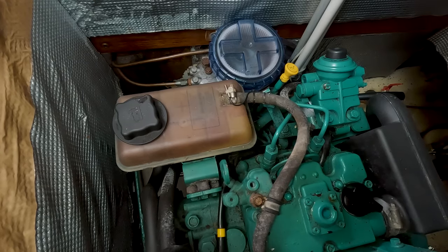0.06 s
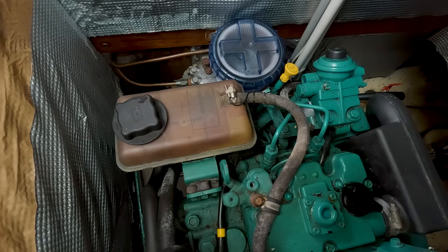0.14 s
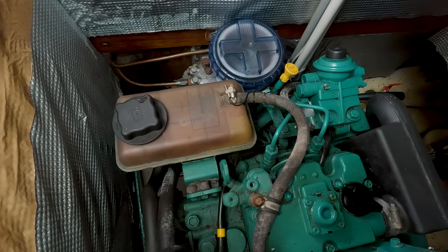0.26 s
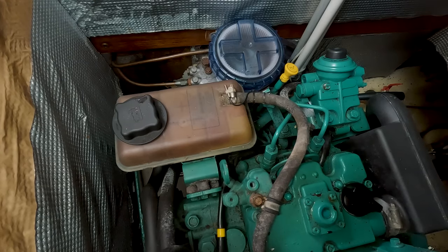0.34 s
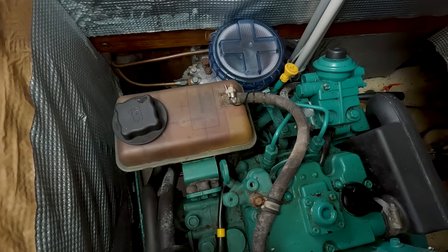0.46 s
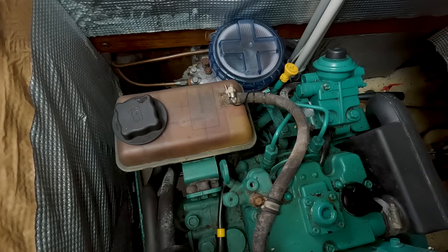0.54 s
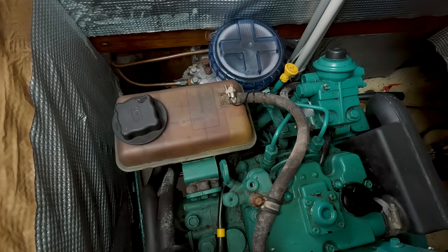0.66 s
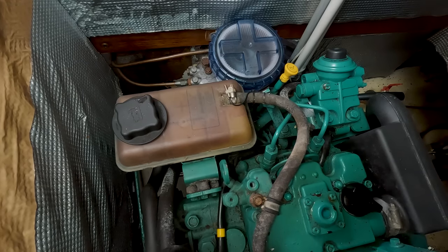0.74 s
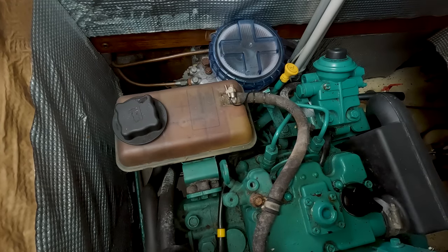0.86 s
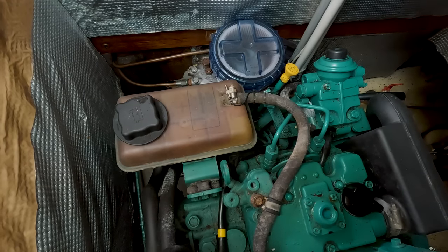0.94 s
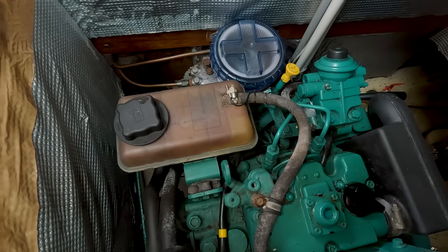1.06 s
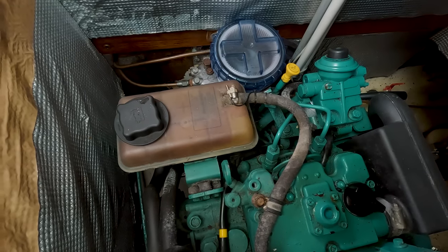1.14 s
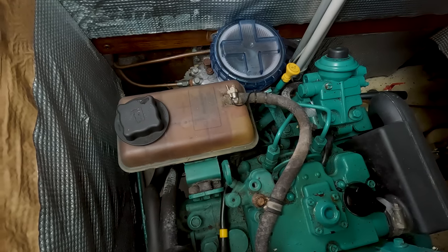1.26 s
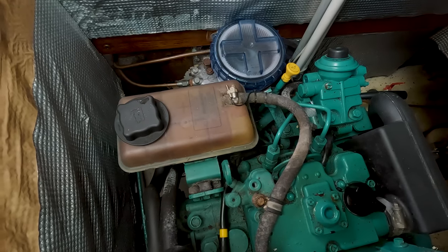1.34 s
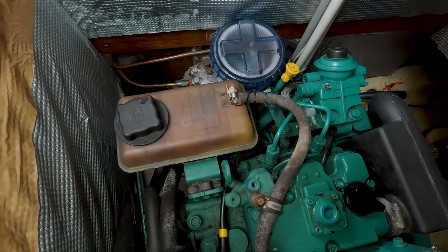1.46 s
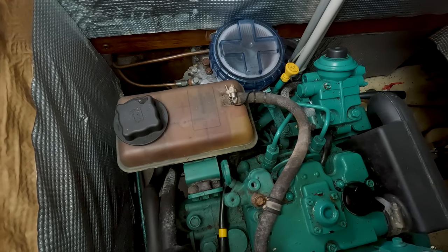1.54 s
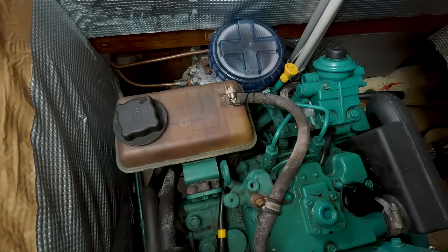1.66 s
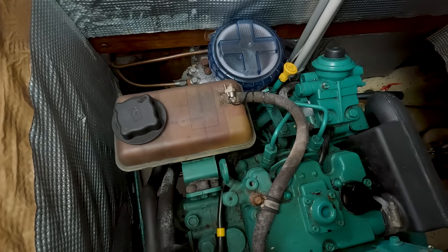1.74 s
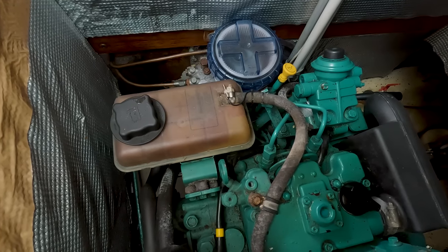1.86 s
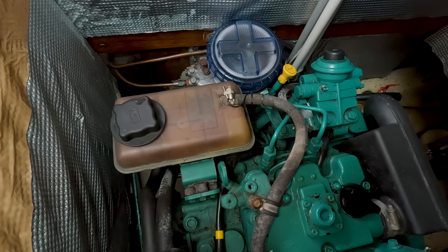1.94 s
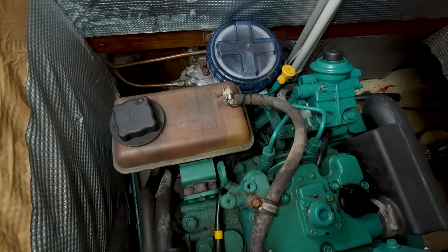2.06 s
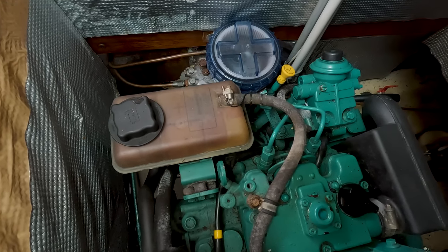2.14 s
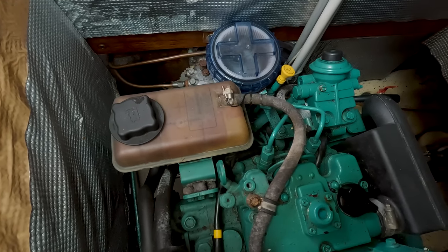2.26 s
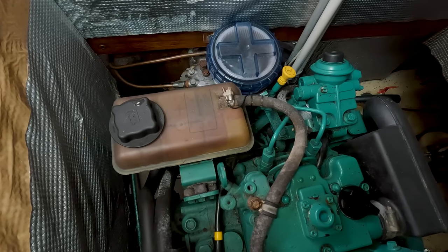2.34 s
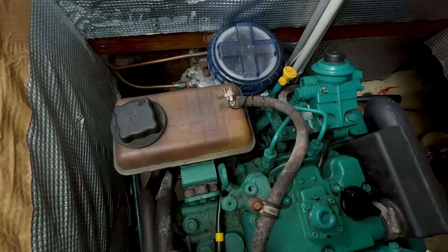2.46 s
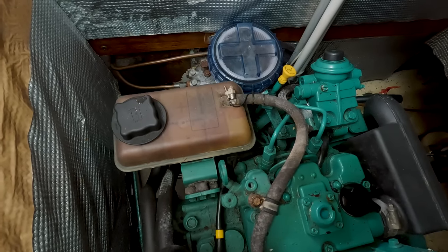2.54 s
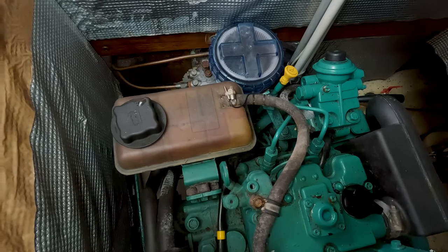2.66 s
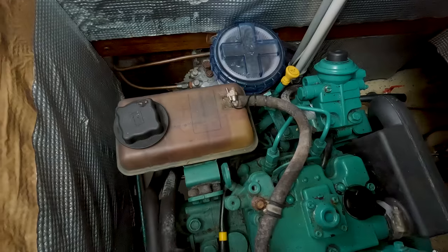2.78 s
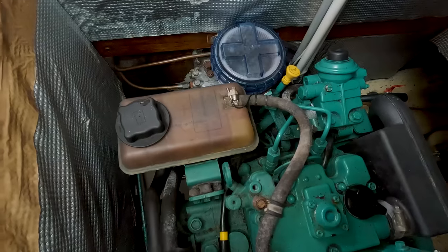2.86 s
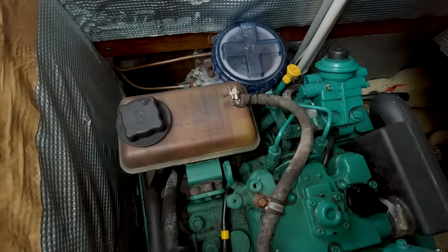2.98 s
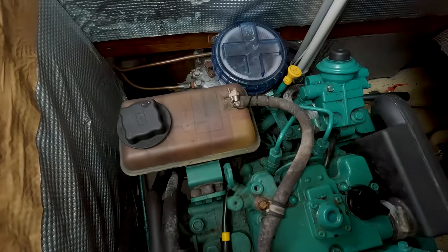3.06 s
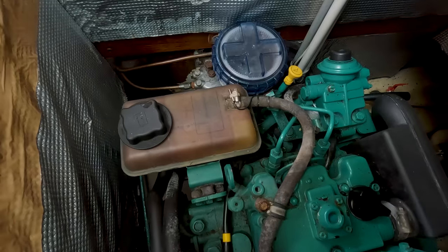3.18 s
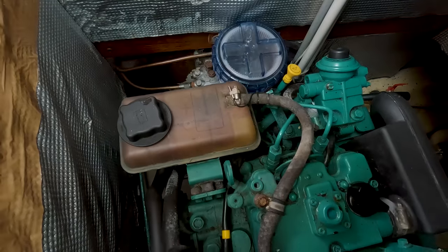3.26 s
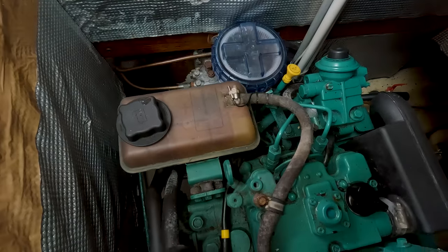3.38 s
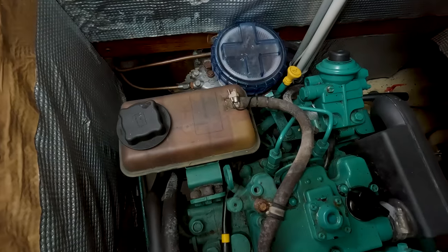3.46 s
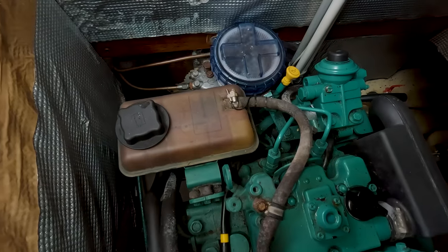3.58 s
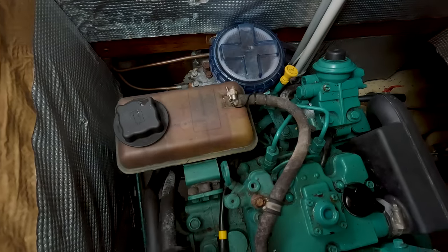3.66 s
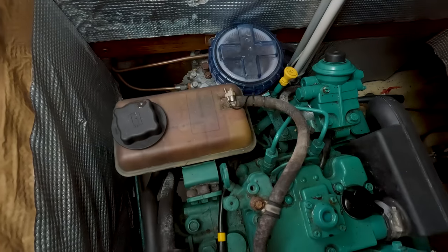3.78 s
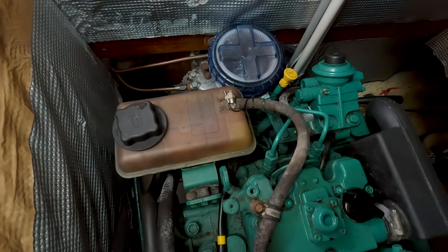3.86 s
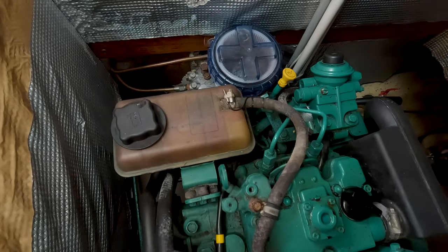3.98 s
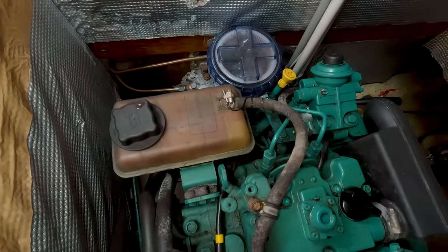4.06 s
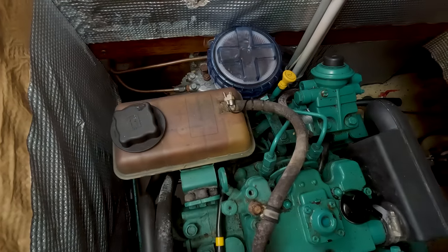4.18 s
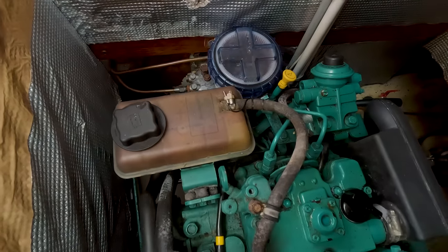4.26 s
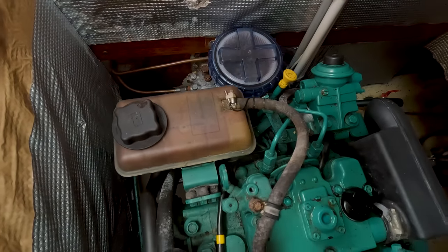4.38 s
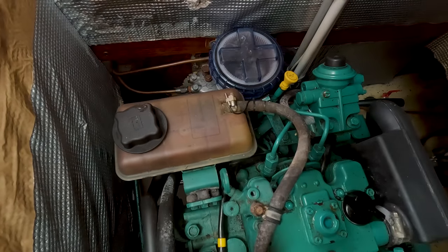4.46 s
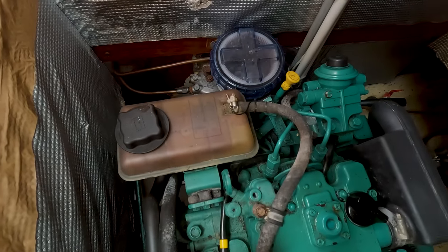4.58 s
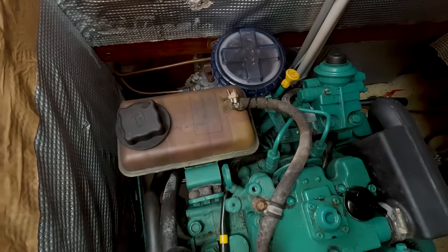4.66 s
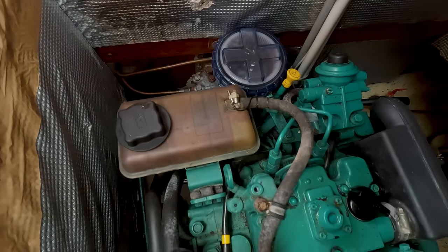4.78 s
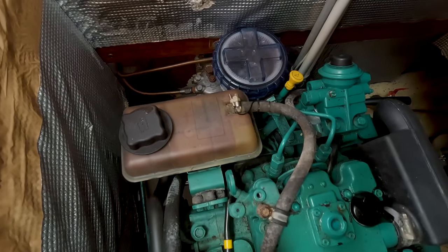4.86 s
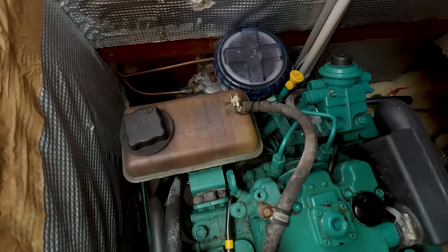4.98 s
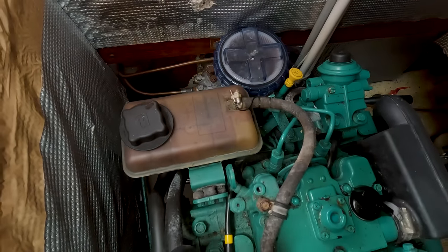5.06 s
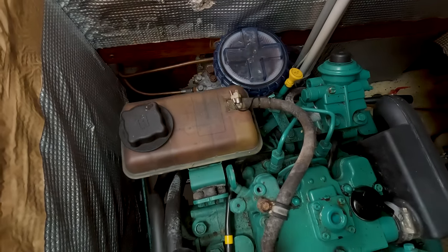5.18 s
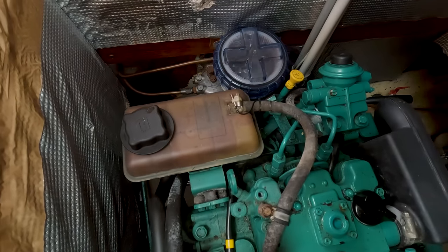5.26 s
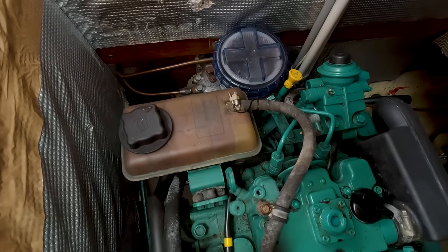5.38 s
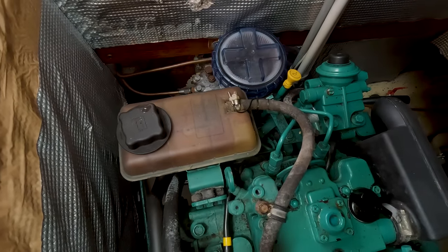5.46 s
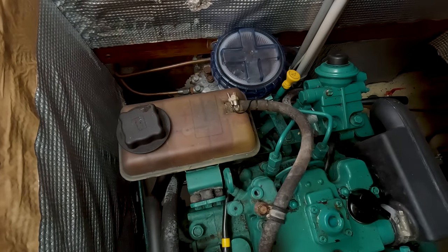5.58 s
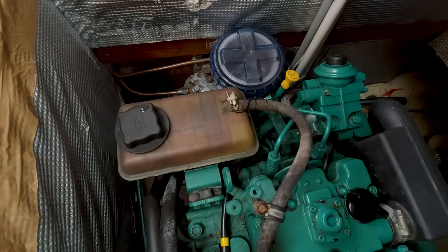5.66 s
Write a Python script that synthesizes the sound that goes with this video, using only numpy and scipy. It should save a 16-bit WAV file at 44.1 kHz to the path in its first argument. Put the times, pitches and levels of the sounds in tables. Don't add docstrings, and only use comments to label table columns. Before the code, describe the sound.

Close above a small two-cylinder diesel in a padded boat engine box: faint handling rumbles, bumps and a soft creak, then a hard starter clack, rising whine and labouring metallic grind. The engine catches quickly and settles into uneven paired knocks with valve ticking and gear whirr. Late on, two gear clunks load and slow it. Phone microphone, nearly mono, dry.

```python
import sys
import numpy as np
from scipy import signal
from scipy.fft import rfft, irfft
from scipy.io import wavfile
from scipy.ndimage import uniform_filter1d, minimum_filter1d

SR = 44100
rng = np.random.default_rng(int(sys.argv[2]) if len(sys.argv) > 2 else 0)


def materialize(psi):
    bounded = np.clip(np.atleast_2d(psi).T, -1, 1)
    quanta = np.round(bounded * 32767).astype(np.int16)
    wavfile.write(sys.argv[1], SR, quanta)


def invert_db(x):
    u = np.asarray(x, float) / 20
    return 10 ** u


N = 252693
TIME = np.arange(N) / SR
STARTER_ON_S, OVERRUN_S, RELEASE_S, IN_GEAR_S = 1.699, 2.053, 2.535, 4.8

# (time [s], level [dB], lower block tones relative [dB])
FIRST_KNOCKS = [(2.4579, 6, -3.5), (2.6055, -0.5, 2), (2.7451, 0, -1), (2.8828, -7, 8), (3.0206, -2, -1),
                (3.1583, 1.5, -9), (3.2975, -7, 6), (3.4376, -1, -6), (3.5786, 0.7, -8), (3.7198, -7, 6.5),
                (3.8613, -1.5, -2.5), (4.0037, 1.5, -19), (4.1444, -2.5, 3.5), (4.2849, -4.5, -1),
                (4.4264, 0.8, -3), (4.5722, -2, 3), (4.7081, 0, -16), (4.8416, 1, -18), (4.9739, -2, -1),
                (5.1118, -2, -24), (5.2592, -1, -6), (5.4178, -4, 2), (5.5847, -2.5, 0.5)]
SECOND_KNOCKS = [(2.4979, -6, 8), (2.6398, -1, 4), (2.7797, -6.5, 6), (2.9163, -0.5, 1.5),
                 (3.0558, 4.5, -3), (3.1927, -2.5, 4.5), (3.3335, -1, 0.5), (3.4736, 4, -10),
                 (3.6158, -9, 5.5), (3.7555, 4.5, -11), (3.897, 1, -1.5), (4.0371, -1, 2.5),
                 (4.1787, 4.5, -9), (4.319, 0, 0.5), (4.4617, 0.7, 2), (4.6019, -2.5, 3), (4.7424, -6, 5.5),
                 (4.8733, -1, 2.5), (5.0069, -5.5, 5), (5.148, -2, -7), (5.2987, 2, -7), (5.4603, 1, -5.5),
                 (5.624, 0, -2)]
# (frequency [Hz], level [dB], 60 dB decay time [s])
FIRST_BLOCK = [(970, -12.5, 0.035), (1264, -1.5, 0.071), (1560, -0.5, 0.033), (1760, 7.5, 0.015),
               (2097, -7, 0.12), (2330, -28, 0.059), (2589, 16.5, 0.039), (2760, -21, 0.031),
               (3117, 11.5, 0.034), (4034.7, -19.5, 0.01), (4350, 9, 0.021)]
SECOND_BLOCK = [(962, -7.5, 0.045), (1120, -0.5, 0.033), (1330, 0.5, 0.023), (1838, 3, 0.034),
                (2054, 0, 0.043), (2620, 2.5, 0.031), (2770, 14, 0.038), (5130, -7, 0.025)]
# (frequency [Hz], level [dB], 60 dB decay time [s])
FIRST_PANELS = [(261.32, -27, 0.0685), (304.8, 8.5, 0.26), (634, -10, 0.1)]
SECOND_PANELS = [(170, -37, 0.19), (202.6, -14.5, 0.39), (271, 4.5, 0.12), (290.5, 8.5, 0.17),
                 (403, -10, 0.26), (640, -23, 0.0568)]


def cylinders():
    first_knocks = np.add(FIRST_KNOCKS, [0, -5.5, 0])
    second_knocks = np.add(SECOND_KNOCKS, [0, -8, 0])
    first = combustion(firings(0, -18.5), first_knocks, FIRST_BLOCK, FIRST_PANELS, 3.3)
    second = combustion(firings(1 / 4, -17), second_knocks, SECOND_BLOCK, SECOND_PANELS, 4.7)
    return first + second


# (frequency [Hz], level [dB per Hz])
CRACK = [(180, -1), (300, -7), (535, -31), (1590, -7.5), (2790, 7), (3130, -31), (3570, -11), (6900, -25),
         (8990, -26.5), (10100, -24), (15500, -67)]
# (frequency [Hz], level [dB per Hz])
TICK = [(3000, -8.5), (6500, 11.5), (8300, -4), (10300, -2.5), (13000, -28), (15500, -20)]


def combustion(fires, knocks, block, panels, boom_db):
    at, db, low_db = np.transpose(knocks)
    db = db - 5 * (at < RELEASE_S)
    upper = ring(knock_force(at, db), [mode for mode in block if mode[0] > 2300])
    lower = ring(knock_force(at, db + low_db), [mode for mode in block if mode[0] <= 2300])
    crack = noise(CRACK, 1.4, 320, blows(at - 0.001, db - 11, 0.0067))
    tick = noise(TICK, 3.0, 350, blows(at + 0.00074, db - 26, 0.0044))
    s, hull_db = np.transpose(fires)
    shake = jolt(s, hull_db + boom_db - 24, 0.01)
    boom = hull(push(s + 0.0028, hull_db + boom_db, 0.002) + shake, panels)
    return band(upper + invert_db(-1.5) * lower, 790, 4500, order=2) + crack + tick + boom


def knock_force(s, db):
    rough = jolt(s - 0.003, db - 16, 0.002) + jolt(s - 0.0006, db - 11, 0.0018)
    hammer = push(s - 0.0012, db - 4.5, 0.00022) + push(s - 0.0008, db - 13, 0.00018)
    slap = jolt(s + 0.0055, db - 13, 0.0012)
    return hammer + rough + slap


def firings(share, boom_db):
    s = crank_times(share)
    return np.c_[s, boom_db + fuel_db(s)]


# (time [s], level [dB])
FUEL = [(2.45, -7.5), (2.65, -1), (3.1, -1), (3.6, -1), (4.6, -2.5), (4.75, -6), (5.15, -6), (5.45, -14),
        (5.73, -13)]


def fuel_db(s):
    return np.interp(s, *np.transpose(FUEL))


# (time [s], speed [turns per minute])
SPEED = [(2.455, 695.2), (2.549, 859.9), (3.05, 872.8), (3.5, 849.8), (4.637, 848.9), (4.824, 931.4),
         (5.2, 804.4), (5.497, 717.7), (5.73, 781.9)]


def crank_times(share):
    cycles = np.cumsum(np.interp(TIME, *np.transpose(SPEED))) / (SR * 120)
    cycles = cycles - np.interp(2.4554, TIME, cycles)
    return np.interp(np.arange(23) + share, cycles, TIME, right=2 * TIME[-1])


def hull(force, modes):
    sound = ring(force, modes)
    return band(sound, 151, 329, order=4) + invert_db(17) * band(sound, 532.83, 533.3, order=2)


# (share of the four-stroke cycle [0-1], clack level [dB], bright tick level [dB])
VALVES = [(.005, -21, -57), (0.255, -26.5, -63), (0.501, -38, -29.5), (.66, -47, -50), (.745, -30, -36.5),
          (.78, -22.5, -39.5)]
# (frequency [Hz], level [dB], 60 dB decay time [s])
COVER = [(1460, -1, 0.047), (2400, 5, 0.0041), (2715, 3.5, 0.01657), (2936, 7.5, 0.035), (3340, 5.5, 0.025),
         (3626, 6, 0.022), (3880, 3, 0.016), (4210, 5, 0.009), (4610, 5, 0.012), (5500, -5.5, 0.038),
         (6050, -39, 0.04), (6540, -37, 0.06)]
# (time [s], level [dB])
CLACKS = [(2.675, -17), (2.6981, -22), (2.7108, -11.5), (2.814, -23), (2.8384, -18), (2.8474, -17),
          (2.9514, -20), (2.9717, -17), (2.9858, -14.5), (3.0903, -16), (3.1153, -24), (3.123, -16.0),
          (3.228, -18), (3.2536, -17), (3.2623, -13.5), (3.367, -19.8), (3.3886, -18.7), (3.4027, -12.5),
          (3.5085, -20), (3.5288, -25), (3.5437, -11), (3.649, -18.7), (3.673, -23), (3.6887, -14.5),
          (3.791, -18), (3.8122, -20), (3.826, -12.5), (3.9328, -15), (3.9541, -22), (3.9673, -22),
          (4.073, -14.5), (4.0976, -16.3), (4.1084, -13.2), (4.2141, -18.5), (4.2376, -19.0), (4.249, -15),
          (4.355, -15.8), (4.377, -17), (4.39, -11.5), (4.4961, -15), (4.5313, -13), (4.5487, -8),
          (4.6393, -18), (4.6622, -15), (4.6717, -15.5), (4.768, -17.0), (4.7984, -22), (4.8078, -14),
          (4.9069, -17), (4.9317, -15), (4.94, -13.5), (5.0416, -18.0), (5.0575, -20.8), (5.081, -15),
          (5.1834, -15.5), (5.2077, -19.9), (5.2208, -12), (5.3363, -18.8), (5.3611, -23), (5.385, -16.5),
          (5.4976, -18), (5.5241, -16), (5.5394, -12), (5.6733, -15), (5.7045, -12)]


def valve_gear():
    clack = tick = 0
    for share, clack_db, tick_db in VALVES:
        s = crank_times(share)
        late, louder, brighter = rng.standard_normal((len(s), 3)).T
        clack_db = clack_db - 7 * ((s > IN_GEAR_S) | (s < RELEASE_S + 0.05))
        clack = clack + jolt(s + 0.0012 * late, clack_db + 1.8 * louder, 0.003)
        tick = tick + blows(s, tick_db + 4 * brighter, 0.006)
    at, db = np.transpose(CLACKS)
    clack = clack + jolt(at, db - 7, 0.0037)
    return invert_db(9) * band(ring(clack, COVER), 1330, 7300, order=2) + noise(TICK, 4.3, 350, tick)


# (share of the cycle [0-1], level [dB])
INTAKE = [(0.57, 4), (0.805, 8), (.955, 5)]
# (frequency [Hz], level [dB], 60 dB decay time [s])
INTAKE_PIPE = [(61.7, -4, 0.089), (84.5, -10.5, 0.046)]


def intake():
    thuds = sum(push(crank_times(share), db, 0.0047) for share, db in INTAKE)
    gulp = unit(ring(-thuds, INTAKE_PIPE))
    flow = unit(band(ring(rng.standard_normal(N), INTAKE_PIPE), 65, 120, order=2))
    age = np.arange(int(0.07 * SR)) / SR
    hz = 68.5 + (277 - 68.5) * np.exp(-age / 0.0337)
    chug = np.sin(2 * np.pi * np.cumsum(hz) / SR) * np.hanning(len(age)) * np.exp(-age / 0.02)
    chugs = signal.fftconvolve(push(crank_times(0.33), 0, 0.00033), chug)[:N]
    gulp_gain = invert_db(-39.5 + 2.4 * (TIME > 5.35)) * (TIME > 1.86)
    return gulp_gain * (gulp + invert_db(-7) * flow) + invert_db(-43.5) * unit(chugs)


# (frequency [Hz], level [dB per Hz])
WHIRR = [(240, -33), (400, -4), (473, -24.5), (633, -2.5), (738, -10), (1420, -1.5), (1960, -2.5),
         (2670, -1), (3410, -5), (4630, -9.5), (6890, -22.5), (9070, -34.5), (10300, -35.5), (12300, -56),
         (15500, -58)]
# (frequency [Hz], level [dB], 60 dB decay time [s])
HULL = [(178, -1, 0.33), (211, -34, 0.26), (248.7, -2, 0.21), (275, 8, 0.043), (285, 16, 0.069),
        (298.4, 3, 0.19), (418, 5.5, 0.16), (620, 7, 0.18)]
# (time [s], level [dB], length [s])
SHIFTS = [
    (4.545, -15.5, 0.024),
    (4.76, -20.5, 0.022),
]


def running_gear():
    drone = unit(hull(rng.standard_normal(N), HULL))
    rest = uniform_filter1d(blows(crank_times(0.68), 0, 0.019), 600)
    drone = invert_db(-8) * drone * (1 - 0.45 * np.clip(rest, 0, 1))
    shift = swells(SHIFTS, 0.011, 0.075)
    whirr_db = -24.5 + 2.5 * (TIME < RELEASE_S) + 1.5 * (TIME > IN_GEAR_S)
    whirr = running() * invert_db(whirr_db) + invert_db(-9) * shift
    shaking = running() * invert_db(-21.5 + 0.082 * fuel_db(TIME)) + shift
    kick = swell(1.66, 1.704, -15.5, 0.013, 0.081)
    return whirr * invert_db(-2) * noise(WHIRR, 3.02, 190) + (shaking + kick) * drone


def running():
    return swell(1.93, 9, 0, 0.15, 1)


# (time [s], gear tooth rate [Hz], whine level [dB])
SPIN = [(1.74, 290, -44), (1.78, 345, -32), (1.812, 372, -19), (1.864, 430, -18), (1.934, 492, -19),
        (2.0, 545, -19), (2.034, 548, -20), (2.05, 510, -24), (2.08, 470, -40)]
# (multiple of the tooth rate, level [dB])
MESH = [(.63, -4), (1, -22), (2, -7), (3, -6), (4, 0), (5, 0), (6, -4), (7, -5), (8, -2), (9, -5), (10, -7),
        (11, -10), (12, -12)]
# (frequency [Hz], gain [dB])
WHINE_PATH = [(200, -20), (320, -13), (700, -14), (810, 1), (960, -14), (1080, -4), (1300, -14), (1510, 0),
              (1640, -5), (1850, 5), (1960, -9), (2040, 0), (2300, -7), (2750, -1), (7000, -12)]
# (time [s], peak level [dB], nose cone relative [dB], length [s])
PINION = [(1.647, -29, -6, 0.011), (1.657, -8, -6, 0.0063), (1.659, -9, -8, 0.004), (1.662, -3, -1, 0.0035),
          (1.667, -3, -12, 0.0027), (1.669, -12, -8, 0.0027), (1.672, -22, -16, 0.0034),
          (1.679, -23, -12, 0.0026), (2.044, -24, 20.5, 0.0083), (2.118, -4.5, 5.5, 0.0034),
          (2.122, -14, -15, 0.009), (2.255, -9.5, 1, 0.003), (2.257, 0, -2, 0.0046),
          (2.278, -4.5, -9, 0.005), (2.284, -0.5, -29, 0.0063), (2.468, -21, -8, 0.009),
          (2.505, -10, -10, 0.0075), (2.526, -7, -3, 0.0039)]
# (frequency [Hz], level [dB], 60 dB decay time [s])
HOUSING = [(1486, -13.5, 0.1376), (1810, -11, 0.02), (1860, -17, 0.018), (1916, 0.5, 0.027),
           (2116, -10, 0.2097), (2340, -12, 0.045), (2624, -0.5, 0.092), (3127, -2, 0.087),
           (3334, 4.5, 0.067), (3460, -7, 0.048), (3836, 7.5, 0.29), (4030, 10.5, 0.036),
           (4445, 9.5, 0.031), (4400, -21, 0.064), (4670, 2, 0.065), (4350, 3, 0.028), (5140, 8, 0.079),
           (5193, 6, 0.14), (5692.6, -28.5, 0.06), (6040, 2.5, 0.0786), (6690, 6, 0.036),
           (6930, -19, 0.039)]
# (frequency [Hz], level [dB per Hz])
GRIND_TONE = [(240, -54), (400, 11), (466, -18), (595, -83), (796, 7.5), (1320, -16), (1880, 10),
              (2220, -1), (2880, 9), (3850, 16.5), (5230, 13.5), (6680, 9), (8930, -21), (10700, -10),
              (13500, -47)]
# (time [s], level [dB], length [s])
LABOUR = [
    (2.18, -30, 0.041),
    (2.335, -27.5, 0.084),
    (2.45, -28, 0.039),
]


def starter():
    s, hz, _ = np.transpose(SPIN)
    phase = 2 * np.pi * np.cumsum(np.interp(TIME, s, hz)) / SR
    whine = tooth_tones(MESH, phase, 600, 2.0, 0.17) * curve(SPIN, 2)

    at, db, nose_db, length = np.transpose(PINION)
    teeth = rng.standard_normal(N) * (1 + 0.5 * np.cos(phase))
    clack = blows(at, db - 8.5, length)
    spin = swell(STARTER_ON_S, OVERRUN_S, -9.5, 0.12, 0.0095)
    engaged = swell(OVERRUN_S, RELEASE_S, 0, 0.0095, 0.0015)
    cranking = engaged * (invert_db(-20.5) + swells(LABOUR, 0.0048, 0.021))
    chatter = swell(STARTER_ON_S - 0.025, 1.81, -15, 0.073, 0.0095)
    nose = invert_db(-11.5) * spin + invert_db(-7.5) * cranking + chatter + blows(at, db + nose_db - 9, length)

    nose_modes = [(f, g, min(t, 0.06)) for f, g, t in HOUSING if f < 2450]
    casing_modes = [(f, g, min(t, 0.07)) for f, g, t in HOUSING if f >= 2450]
    loaded_modes = [(f * 0.99, g - 8 * (f > 4800), t * 0.7) for f, g, t in casing_modes]
    rings = invert_db(-19) * ring(teeth * nose, nose_modes)
    rings = rings + invert_db(-23) * ring(teeth * (spin + 2.06 * clack), casing_modes)
    rings = rings + ring(push(at, db + nose_db - 8.5, 0.0002), [(1760, -7, 0.03), (1927, 3, 0.043)])
    rings = rings + invert_db(-20.5) * ring(teeth * cranking, loaded_modes)

    scraping = invert_db(-11) * spin + invert_db(-8) * cranking
    scraping = scraping + swell(RELEASE_S, RELEASE_S + 0.011, -32.5, 0.012, 0.66)
    scrape = band(noise(GRIND_TONE, 3.5, 200, scraping + invert_db(-2.5) * clack), 446, 15400, order=5)
    shaft_modes = [(880, -2, 0.082), (1290, -9, 0.059), (1449, -1, 0.12)]
    shaft = engaged * invert_db(-36.5) * unit(ring(rng.standard_normal(N), shaft_modes))
    shaft = shaft * np.clip((TIME - 2.15) / 0.062, 0, 1)
    return (solenoid() + drag() + shape(whine, WHINE_PATH) + band(rings, 1650, 5480, order=2)
            + scrape + shaft)


def solenoid():
    spring_back = push(RELEASE_S - 0.01, -15.5, 0.0005)
    clunk = ring(spring_back, [(936, 0, 0.058), (1110, -1, 0.062), (636, -8, 0.065)])
    slam = blows([1.663, 1.669, 1.675], -16.5, 0.0058)
    return clunk + noise([(900, -13), (1500, -3), (2900, 4), (4000, -6), (6000, -32)], 2.3, 300, slam)


# (time [s], gear tooth rate [Hz], level [dB])
DRAG = [(2.08, 760, -33), (2.11, 745, -30), (2.17, 719, -42), (2.23, 630, -27), (2.28, 745, -34),
        (2.34, 715, -31), (2.39, 735, -26.5), (2.44, 712, -32), (2.52, 720, -28)]
# (multiple of the tooth rate, level [dB])
DRAG_MESH = [(1.2, -10), (2, 0), (2.602, -5), (2.95, 0)]


def drag():
    s, hz, _ = np.transpose(DRAG)
    phase = 2 * np.pi * np.cumsum(uniform_filter1d(np.interp(TIME, s, hz), size=600)) / SR
    return tooth_tones(DRAG_MESH, phase, 500, 2.6, 0.4) * curve(DRAG, 2)


def tooth_tones(mesh, phase, smooth, wobble_db, wobble_rad):
    wobble = uniform_filter1d(rng.standard_normal((len(mesh), N)), smooth, axis=1) * np.sqrt(smooth)
    return sum(invert_db(db + wobble_db * w) * np.sin(k * phase + wobble_rad * w)
               for (k, db), w in zip(mesh, wobble))


# (time [s], thud level [dB], knock relative [dB], click relative [dB], length [s])
BUMPS = [(0.07, -31, -6, -41, 0.007), (0.095, -51, -13.5, -26.5, 0.01168), (0.126, -33, -1.5, -35, 0.023),
         (0.506, -33.5, -26, -41, 0.014), (0.803, -27, -20, -50, 0.004), (0.814, -19, -3.5, -21, 0.0067),
         (0.8183, -15, -24, -30, 0.04), (0.833, -27, -20, -40, 0.025), (0.866, -36, -7, -36, 0.007),
         (0.9, -37, 3, -46, 0.036), (0.932, -32, -12, -40, 0.005), (1.022, -46, -3, -21, 0.01407),
         (1.463, -42, 1, -21, 0.014), (1.511, -30.5, -2.5, -30, 0.0095), (1.589, -18.5, -26, -39, 0.002),
         (1.612, -15, -23, -50, 0.0051), (1.673, -20.5, 1, 6, 0.029), (1.688, -23, -22, -40, 0.01),
         (1.705, -16, -23, -40, 0.018), (1.738, -18.5, -9, -40, 0.011), (1.807, -20, -9, -40, 0.016),
         (4.553, -34, 9, 2, 0.018), (4.567, -24, 2, -7, 0.02), (4.758, -17.5, -11.5, -22, 0.037),
         (4.814, -4.5, -23, -28, 0.018)]
# (frequency [Hz], level [dB per Hz])
BODY = [(100, -64), (300, -19), (600, 8), (1000, 1.5), (1800, -6), (3000, -72), (8000, -54)]
# (frequency [Hz], level [dB per Hz])
CLICK = [(1800, -14), (2500, -7), (2900, 0), (3700, 0), (4500, -5), (5200, -15), (12000, -40)]
# (time [s], level [dB], length [s])
SCRAPES = [(0.115, -57, 0.1), (0.35, -70, 0.1), (0.566, -64, 0.15), (0.89, -41, 0.048), (1.03, -61, 0.061),
           (1.461, -55, 0.018), (1.512, -51, 0.022)]
# (time [s], level [dB], length [s])
CREAKS = [
    (.745, -44.5, 0.033),
    (1.227, -37.5, .035),
]
# (time [s], rumble level [dB], length [s], deep sway level [dB])
MOVES = [(.055, -40.5, 0.14, -71), (.15, -59, 0.06, -55), (.3, -47.5, 0.14, -72), (.45, -49.5, 0.11, -73),
         (.72, -58, 0.12, -75), (.815, -37, 0.071, -71), (1.0, -59, 0.02, -100), (1.22, -51, 0.14, -63),
         (1.345, -42.5, 0.022, -68), (1.44, -42, 0.078, -72), (1.5, -40, 0.043, -76),
         (1.585, -32.5, 0.076, -60), (1.745, -36.5, 0.025, -48)]
# (frequency [Hz], level [dB per Hz])
RUMBLE = [(24, -58), (40, -69), (118, -13), (190, 6.5), (337, -3.5), (399, -36), (501, -14), (544, -4.5),
          (578, -12), (700, -14.5), (910, -67), (1540, -120)]
# (frequency [Hz], level [dB per Hz])
RUSTLE = [(240, -16), (400, -10.5), (539, -11.5), (579, -15), (781, -15.5), (939, -17.5), (2500, -22.5),
          (5260, -35), (12000, -57), (15600, -83), (22000, -120)]


def handling():
    s, db, body_db, click_db, length = np.transpose(BUMPS)
    boards = [(153, -3, 0.32), (233.5, 4, 0.096), (264, 0, 0.074),
              (297.5, -1.5, 0.21), (531, -12, 0.045), (816, -4, 0.062)]
    thud = band(ring(push(s, db, 0.0029) + jolt(s, db - 9, length), boards), 208, 1400, order=3)
    knock = noise(BODY, 2, 250, blows(s, db + body_db - 5, length))
    bump_click = blows(s, db + click_db + 7, length * 0.31)
    click = noise([(800, -2.5), (5000, 6), (8000, -10), (13000, -34.5)], 1.0, 250, bump_click)

    slide = sum(swell(at, at + span / 4, g, 0.004, span / 2) for at, g, span in SCRAPES)
    click = click + noise(CLICK, 1.9, 250, slide)
    graze = invert_db(-9) * noise(BODY, 2, 250, slide)

    hand = swells(MOVES, 0.01, 0.049)
    rustle = invert_db(-55) + invert_db(-28.5) * hand ** 0.78
    rub = (hand + invert_db(-61)) * noise(RUMBLE, 3.0, 30.1) + rustle * noise(RUSTLE, 1.3, 71)
    rub = band(rub, 116, 17000, order=6)
    sway = swells(MOVES, 0.01, 0.015, axis=3) * unit(band(rng.standard_normal(N), 40, 115, order=2))

    latch = ring(jolt(1.512, -39, 0.0033), [(5400, -4, 0.028), (2670, 3, 0.03), (3300, -3, 0.022)])
    creak = ring(jolt(*np.transpose(CREAKS)), [(138, 0, 0.19), (158, 0, 0.12)])
    return band(creak, 112, 240, order=3) + latch + thud + knock + click + graze + rub + sway


def shape(x, points):
    hz, db = np.transpose(points)
    log_gain = np.interp(np.log(np.linspace(1, SR / 2, 4097)), np.log(hz), db) * np.log(10) / 20
    cepstrum = irfft(log_gain)
    cepstrum[1:4096] *= 2
    cepstrum[4097:] = 0
    return signal.fftconvolve(x, irfft(np.exp(rfft(cepstrum))))[:N]


def unit(x):
    return x / np.sqrt(np.mean(x ** 2))


def noise(points, flicker_db, rate, gate=0.9):
    k = int(SR / rate)
    walk = uniform_filter1d(np.repeat(rng.standard_normal(N // k + 1), k), k)[:N]
    white = rng.standard_normal(N)
    return shape(white * gate * invert_db(flicker_db * walk), points) / np.std(shape(white, points))


def ring(x, modes):
    hz, db, t60 = np.transpose(modes)[:, :, None]
    age = np.arange(SR // 3) / SR
    response = np.sum(invert_db(db) * np.sin(2 * np.pi * hz * age) * 1000. ** (-age / t60), axis=0)
    return signal.oaconvolve(x, response)[:N] / np.sqrt(np.sum(invert_db(db) ** 2))


def blows(times, db, decay):
    out = np.zeros(N)
    for s, gain, fall in np.broadcast(times, invert_db(db), decay):
        at = int(max(s, 0) * SR)
        span = out[at:at + int(8 * abs(fall) * SR) + 1]
        span += gain * np.exp(-np.arange(len(span)) / (abs(fall) * SR))
    return out


def jolt(times, db, decay):
    envelope = blows(times, db - 10 * np.log10(np.abs(decay) * SR / 2), decay)
    return envelope * np.sign(rng.standard_normal(N))


def push(times, db, width):
    window = np.hanning(int(width * SR))
    return signal.fftconvolve(blows(times, db, 1e-5), window / window.sum())[:N]


def curve(table, column):
    rows = np.array(table)
    return invert_db(np.interp(TIME, rows[:, 0], rows[:, column], left=-120, right=-120))


def band(x, low_hz, high_hz, order):
    return signal.sosfilt(signal.butter(order, [low_hz, high_hz], "band", fs=SR, output="sos"), x)


def swell(on_s, off_s, db, rise_s, fall_s):
    rise = np.clip((TIME - on_s) / rise_s, 0, 1)
    return invert_db(db) * rise * np.exp(-np.clip(TIME - off_s, 0, None) / fall_s)


def swells(rows, rise_s, fall_s, axis=1):
    return sum(swell(r[0], r[0] + r[2], r[axis], rise_s, fall_s) for r in rows)


# (frequency [Hz], side minus mid [dB])
SIDE_LEVEL = [(60, -34), (200, -55), (700, -29.5), (1300, -31.5), (2400, -38.5), (4400, -31), (8000, -22.5),
              (10300, -19), (11500, -3.5), (15500, 0)]


def scene():
    mid = cylinders() + valve_gear() + intake() + running_gear() + starter() + handling()
    scatter = unit(band(rng.standard_normal(N), 20, 150, order=4))
    side = shape(mid * scatter, SIDE_LEVEL)
    return np.array([mid + side, mid - side])


def roll_off(x):
    return signal.sosfilt(signal.butter(12, 15800, fs=SR, output="sos"), x)


# (frequency [Hz], gain [dB])
MIC = [(20, -16), (45, -19), (60, 1.5), (8600, -2), (9050, -14.5), (9400, -2.5), (12000, 4.5), (15600, -5),
       (15900, -60)]


def record(dry):
    heard = invert_db(0.5) * np.array([shape(channel, MIC) for channel in dry])
    ceiling = 0.93
    room = ceiling / np.maximum(np.abs(heard).max(axis=0), ceiling)
    gain = uniform_filter1d(minimum_filter1d(room, size=200), size=200)
    return roll_off(heard * gain)


dry = scene()
out = record(dry)
materialize(out)
```